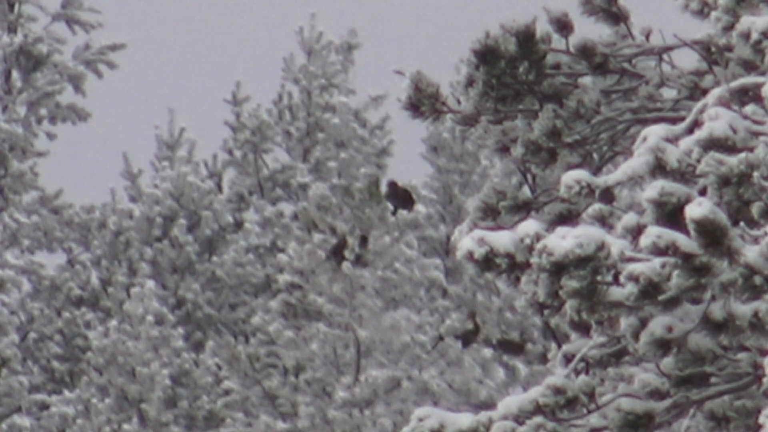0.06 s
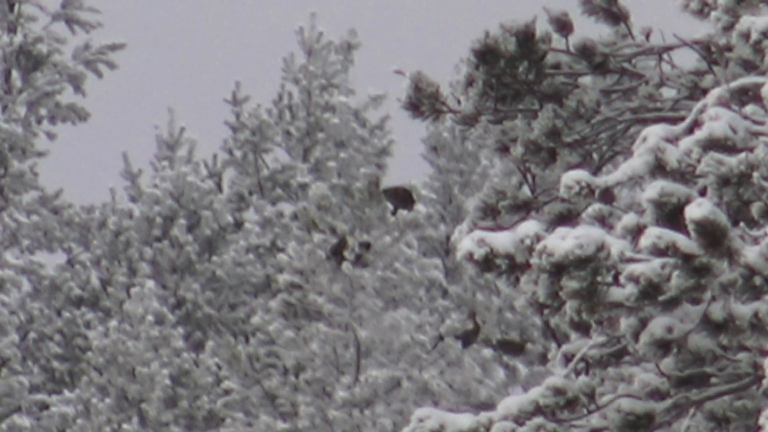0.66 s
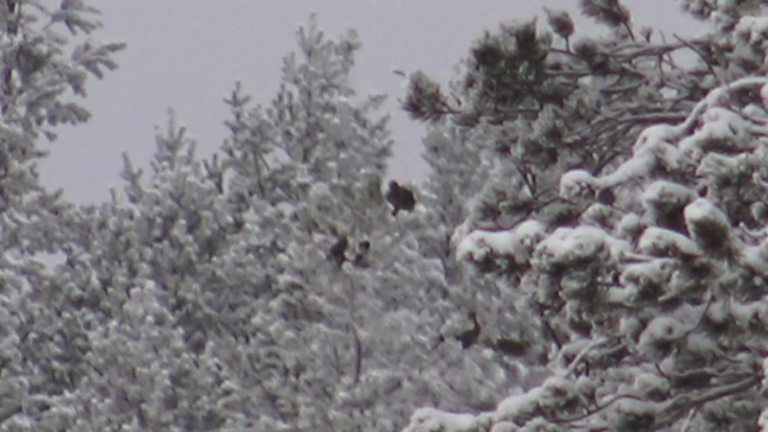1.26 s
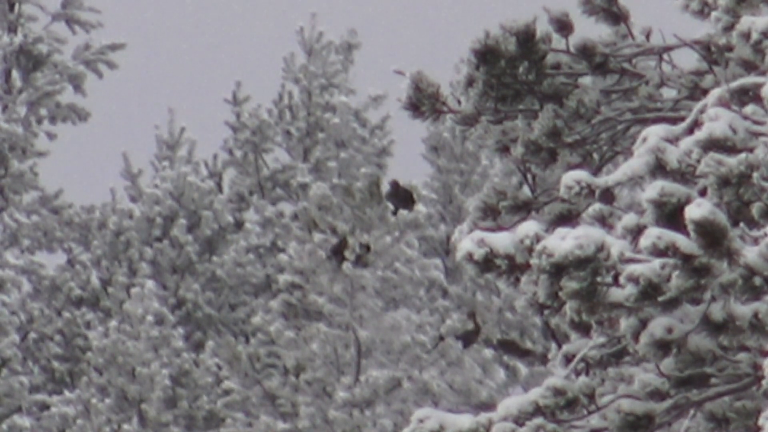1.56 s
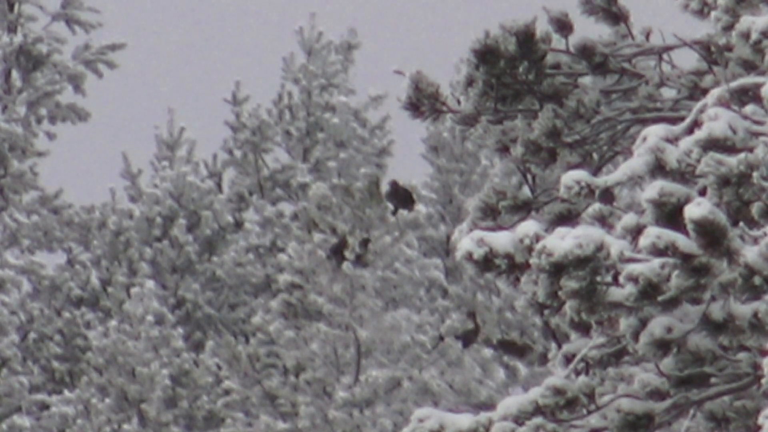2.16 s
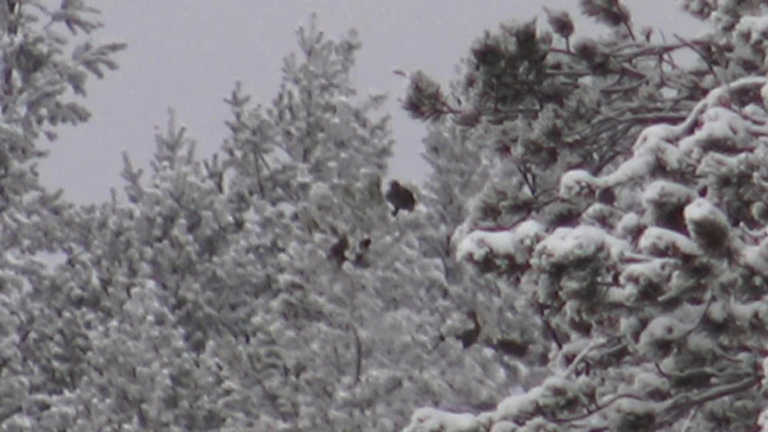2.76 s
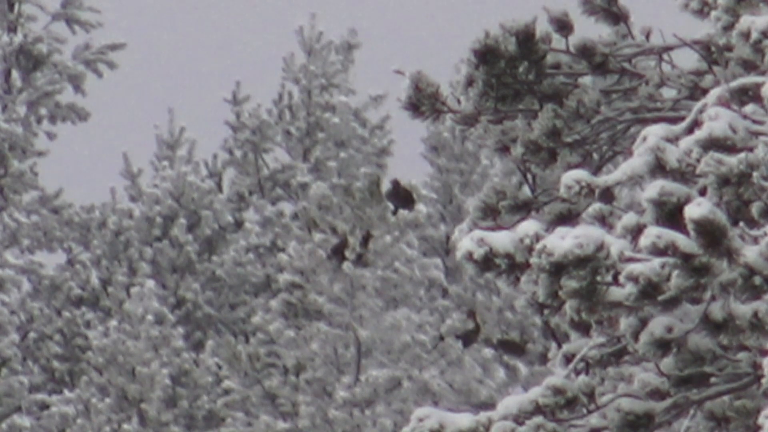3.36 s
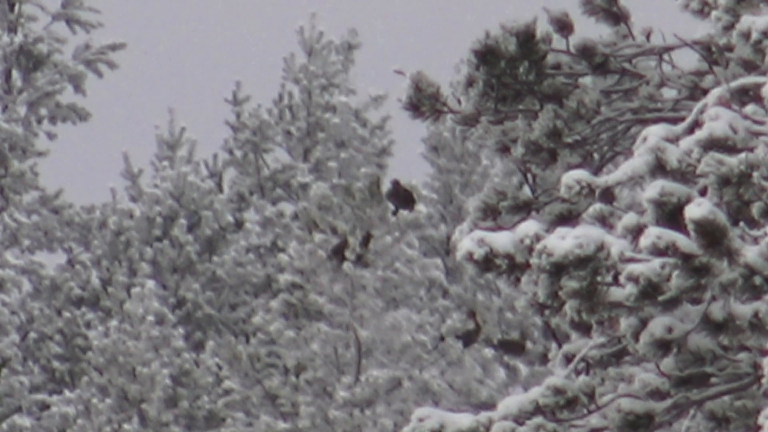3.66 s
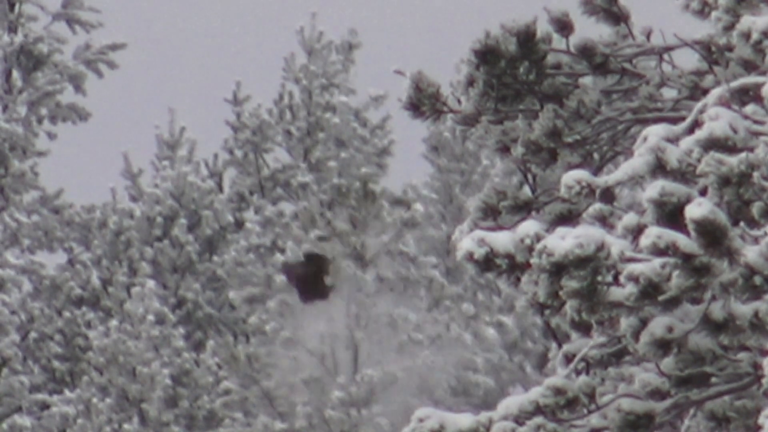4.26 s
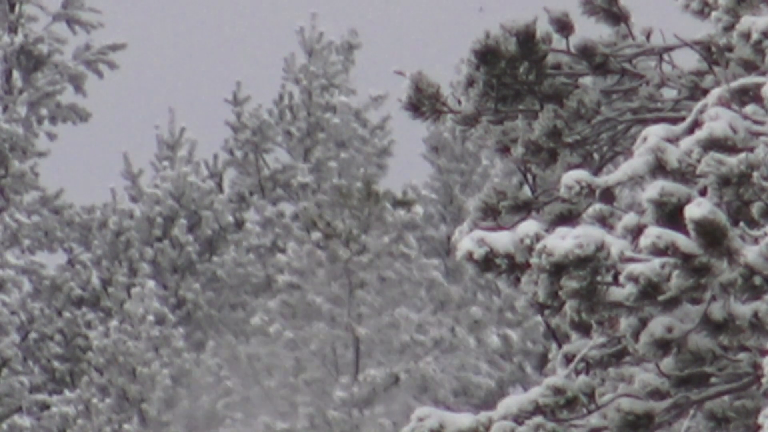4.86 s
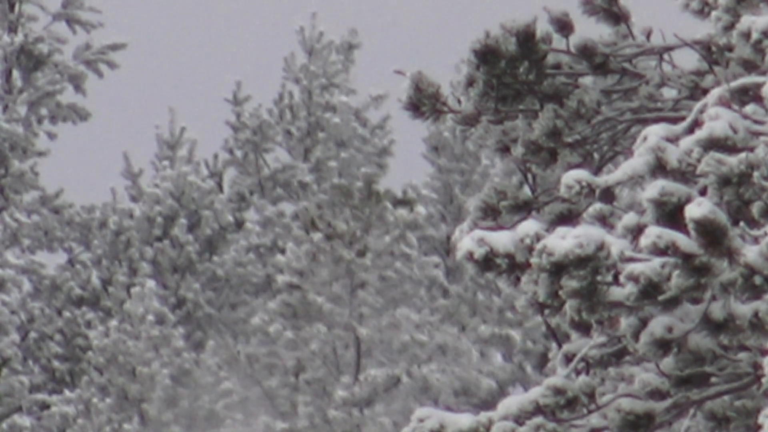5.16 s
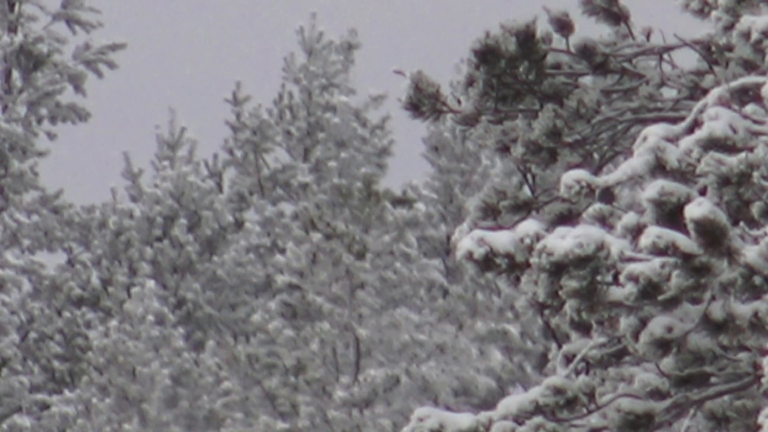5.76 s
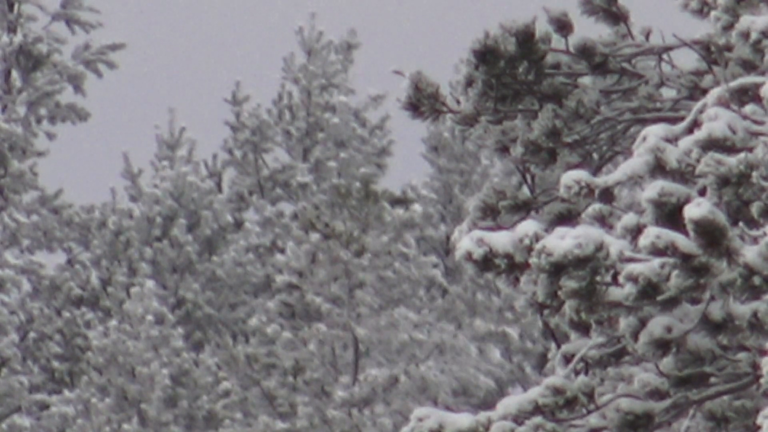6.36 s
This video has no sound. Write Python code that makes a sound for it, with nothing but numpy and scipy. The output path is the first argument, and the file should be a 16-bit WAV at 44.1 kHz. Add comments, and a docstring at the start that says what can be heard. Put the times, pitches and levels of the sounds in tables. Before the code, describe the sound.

Faint winter forest hiss, then one close rifle shot with crackling echoes and a long tail that dulls and fades.

```python
"""First comes the faint hiss of a still, snowy forest, with puffs of air and a low hum that comes and goes.
Then one rifle shot goes off, close enough to overload the microphone. Trunks throw back sharp cracks,
and the bang rolls away through the trees, duller the farther it has travelled. The thud of the bullet's
strike returns from far off, and snow rustles softly at the end."""
import sys
import numpy as np
from scipy import signal
from scipy.fft import rfft, irfft, next_fast_len
from scipy.io import wavfile
from scipy.ndimage import uniform_filter1d

SR = 44100
rng = np.random.default_rng(int(sys.argv[2]) if len(sys.argv) > 2 else 0)


def unload_wav(signal):
    """Save mono or channel-first audio to the path in sys.argv[1] as 16-bit WAV at rate SR, clipped to [-1, 1]."""
    wavfile.write(
        sys.argv[1],
        SR,
        np.round(np.clip(np.atleast_2d(signal).T, -1, 1) * 32767).astype(np.int16),
    )


N = 287532
TIME = np.arange(N) / SR
SHOT_S, STRIKE_S = 3.6084, 4.2842


def from_db(db):
    """Turn decibels (dB) into a number to multiply by."""
    return 10 ** (np.asarray(db) / 20)


def rms_one(x):
    """Scale a sound so that its average strength (rms) is 1."""
    return x / np.sqrt(np.mean(x ** 2) + 1e-20)


def cut(x, hz, keep, order=2):
    """Keep the "low" or "high" side of hz; a higher order cuts more steeply."""
    return signal.sosfilt(signal.butter(order, min(hz, .45 * SR), keep, fs=SR, output="sos"), x + 1e-18)


def band(x, bottom_hz, top_hz, bottom_order=2, top_order=2):
    """Keep what lies between two frequencies."""
    return cut(cut(x, top_hz, "low", top_order), bottom_hz, "high", bottom_order)


def colour_gain(colour, hz):
    """Read the gain at hz from a colour table, which says how strong lows and highs are."""
    points_hz, levels_db = np.transpose(colour)
    return from_db(np.interp(np.log(hz), np.log(points_hz), levels_db))


def noise(colour):
    """Noise of a given colour, with strength 1."""
    bin_hz = np.maximum(np.fft.rfftfreq(N, 1 / SR), 1)
    return rms_one(irfft(rfft(rng.standard_normal(N)) * colour_gain(colour, bin_hz), N))


def wander(hz):
    """A slow random wobble of strength 1; a higher hz wobbles faster."""
    return rms_one(cut(rng.standard_normal(N), hz, "low"))


def swell(peak_s, width_s, level_db):
    """A smooth, bell-shaped rise and fall of power."""
    return from_db(level_db) ** 2 * np.exp(-((TIME - peak_s) / width_s) ** 2 / 2)


def dying(start, t60):
    """A level that jumps to 1, then drops 60 dB every t60 seconds."""
    return (TIME >= start) * from_db(-60 * np.maximum(TIME - start, 0) / t60)


def shock(start, push_s):
    """A blast wave: a sudden push of height 1, then a longer, weaker suction."""
    age = np.maximum(TIME - start, 0) / push_s
    return (TIME >= start) * (1 - age) * np.exp(-np.minimum(age, 50))


# The colour of the quiet forest. Each row: frequency in Hz, relative level in dB.
HISS_COLOUR = [(60, -0.5), (100, -3.5), (150, -7.5), (200, -8), (233, -4.5), (280, -11.5), (400, -13),
               (600, -15.5), (800, -18.5), (980, -17), (1250, -21), (2000, -25.5), (4000, -29), (8000, -32),
               (15500, -35)]

def forest_hiss(level_db=-67.06):
    """The still forest gives a faint, steady hiss."""
    return from_db(level_db) * noise(HISS_COLOUR)


def forest_rumble(sway_db=-59, rumble_db=-69):
    """Slow swings of air pressure and a deep rumble lie under everything."""
    sway = from_db(sway_db) * wander(hz=12)
    return sway + from_db(rumble_db) * rms_one(band(rng.standard_normal(N), 38, 64, top_order=5))


# Puffs of air. Each row: time of the peak in seconds, width in seconds, relative level in dB.
PUFFS = [(.19, 0.044, -39.5), (.45, 0.18, -47), (.82, 0.12, -46.5), (1.26, 0.089, -46.5),
         (2.35, 0.057, -49.5)]

def air_puffs(level_db=-3, calm_db=-61.5):
    """Air stirs at the microphone, swelling now and then into a soft, deep puff."""
    strength = np.sqrt(from_db(calm_db) ** 2 + sum(swell(*puff) for puff in PUFFS))
    return from_db(level_db) * strength * rms_one(band(rng.standard_normal(N), 14, 38, top_order=3))


# Swells of the hum. Each row: peak time in seconds, width in seconds, relative level in dB, pitch in Hz.
HUM_SWELLS = [(.38, 0.042, -44.5, 63.9), (.55, 0.048, -46.5, 69.9), (.82, 0.12, -53.5, 44.9),
              (4.62, 0.051, -52.5, 56), (4.84, .05, -49, 54), (4.97, .04, -48.5, 65),
              (5.29, 0.062, -57.5, 51.2), (5.64, .13, -51.5, 46.04), (6.18, 0.033, -57, 42.9)]

def low_hum(level_db=-2, waver=.5):
    """A wavering hum glides from the pitch of one swell to that of the next."""
    peaks_s, _, _, pitches_hz = np.transpose(HUM_SWELLS)
    hz = np.interp(TIME, peaks_s, pitches_hz)
    phase = 2 * np.pi * np.cumsum(hz) / SR + wander(hz=5)
    strength = np.sqrt(sum(swell(s, width, db) for s, width, db, _ in HUM_SWELLS))
    return from_db(level_db) * strength * (1 + waver * wander(hz=8.5)) * np.sqrt(2) * np.sin(phase)


# The colour of the gas burst and the bright spray. Each row: frequency in Hz, relative level in dB.
SPRAY_COLOUR = [(25, -10), (50, 0.5), (160, -11.5), (400, -0.5), (650, -1.5), (1000, -12), (1500, -1.5),
                (3000, -0.5), (4800, 0), (6200, -3.5), (7900, 4), (10000, -2), (15500, -3.5)]

def rifle_shot(lead_s=.0011, push_s=.00048, swing_hz=660, handover_s=3.65):
    """A short crack leads the blast and its burst of gas; sound sprays back off close twigs and snow."""
    crack = from_db(-8) * rms_one(band(rng.standard_normal(N), 1300, 2500))
    crack *= dying(SHOT_S - lead_s, t60=.02)
    blast = -from_db(8) * shock(SHOT_S, push_s)
    # the blast leaves a brief, hollow swing behind it
    blast -= from_db(-5) * np.sin(2 * np.pi * swing_hz * (TIME - SHOT_S)) * dying(SHOT_S, t60=.016)
    gas = from_db(1) * rms_one(band(noise(SPRAY_COLOUR), 380, 7000, top_order=1))
    gas *= dying(SHOT_S + push_s / 2, t60=.02)
    spray = from_db(-16) * noise(SPRAY_COLOUR) * dying(SHOT_S, t60=.5)
    # the close twigs are soon all reached, and the spray gives way to the rolling echo
    spray *= from_db(-60 * np.maximum(TIME - handover_s, 0) / .22)
    return crack + blast + gas + spray


# Groups of trees, each sending back one wave of the rolling echo. Each row: start, rise time and hold
# time in seconds, relative level in dB, fall in dB per second, extra treble from a clear path in dB.
TREE_GROUPS = [(3.648, 0.21, 0.033, -20.5, 35, -.5), (4.002, 0.15, .03, -25.5, 19.5, -1),
               (4.38, .012, 0.072, -19.5, 62.5, 7.5), (4.731, .06, .02, -33.5, 31, 9),
               (4.857, 0.026, 0.025, -29, 26, 12), (5.92, .08, .02, -57, 19.5, 3),
               (6.437, 0.063, .05, -55.5, 26, -1)]

def echo_waves(rise_power=.62, clear_fade_s=.25):
    """The waves rise, hold and fall; gives their joint level and their extra treble, both in dB."""
    power, treble = np.full(N, 1e-14), np.zeros(N)
    for start, rise, hold, level_db, fall_db_per_s, clear_db in TREE_GROUPS:
        rising = np.clip((TIME - start) / rise, 0, 1) ** rise_power
        fallen_db = fall_db_per_s * np.maximum(TIME - start - rise - hold, 0)
        wave = (rising * from_db(level_db - fallen_db)) ** 2
        power += wave
        # later echoes come from deeper among the trees, so the extra treble fades
        treble += wave * clear_db * np.exp(-np.maximum(TIME - start, 0) / clear_fade_s)
    return 10 * np.log10(power), treble / power


# The colour of the rolling echo before it dulls. Each row: frequency in Hz, relative level in dB.
ROLL_COLOUR = [(100, -60), (180, -44.5), (280, -29.5), (450, -18), (700, -6.5), (1000, -1), (1500, 5.5),
               (2200, 7), (3000, 3.5), (4200, -1), (5300, 0.5), (6500, -7.5), (8100, 1.5), (10000, -8.5),
               (15500, -9.5)]

def rolling_echo(level_db=-1, echoes_per_s=5000, loss_power=.53, patchy_db=1.3):
    """Thousands of small echoes merge; air and snow take more treble as their paths grow longer."""
    after = TIME >= SHOT_S
    age = TIME[after] - SHOT_S
    count = len(age)
    waves_db, clear_db = (curve[after] for curve in echo_waves())
    travel_loss_db = np.minimum(-7.5 + 38 * age ** .63, 58)
    # some paths are clearer than others, so the treble comes in patches
    dull_db = travel_loss_db - clear_db + patchy_db * wander(hz=25)[after]
    # echoes differ in strength, a little more so early on
    grain_db = 3 + .7 * np.exp(-age / .8)
    echoes = (rng.random(count) < echoes_per_s / SR) * rng.choice([-1, 1], count)
    echoes = echoes * from_db(grain_db * np.minimum(rng.exponential(1, count), 3.5))
    echoes /= np.sqrt(np.maximum(uniform_filter1d(echoes ** 2, size=800), 1e-9))  # even out the level
    size = next_fast_len(count)
    bin_hz = np.maximum(np.fft.rfftfreq(size, 1 / SR), 1)
    # scaled so that the octave round 1 kHz has a strength of about 1
    spectrum = rfft(echoes, size) * colour_gain(ROLL_COLOUR, bin_hz) * np.sqrt(SR / 2 / 800)
    # split into overlapping bands, so that each can fade at its own pace
    centres_hz = np.geomspace(300, 16000, 18)
    band_number = np.interp(np.log(bin_hz), np.log(centres_hz), np.arange(len(centres_hz)))
    out = np.zeros(N)
    for k, hz in enumerate(centres_hz):
        # this band's share of the dulling: 0 at 1 kHz, 1 at 4 kHz
        share = ((max(hz, 380) / 1000) ** loss_power - 1) / (4 ** loss_power - 1)
        one_band = irfft(spectrum * np.maximum(1 - abs(band_number - k), 0), size)[:count]
        out[after] += one_band * from_db(level_db + waves_db - dull_db * share)
    return out


def faint_trunks(per_s=32, from_s=3.68, until_s=4.27, fade_db_per_s=12, count=64):
    """Fainter trunks answer from random distances; gives rows like those of LOUD_TRUNKS."""
    starts = from_s + np.cumsum(rng.uniform(.2, 1.8, count)) / per_s
    levels_db = -14.5 - fade_db_per_s * (starts - from_s) + 2 * rng.standard_normal(count)
    thickness = np.exp(.17 * rng.standard_normal(count))
    return np.transpose([starts, levels_db, thickness])[starts < until_s]


# The loudest echoes off single trunks.
# Each row: start in seconds, relative level in dB, thickness (1 is an ordinary trunk).
LOUD_TRUNKS = [(3.6576, -10.5, 0.73), (3.6682, -2.5, 1.16), (3.6772, -4.5, 2.7), (3.6850, -12.5, 0.76),
               (3.7100, -1.5, 0.93), (3.7131, -9.5, 1.4), (3.739, -6, 0.79), (3.7480, -5, 0.84),
               (3.7646, -3, 1.24), (3.8037, -3.5, 1), (3.8056, -5, 1), (3.8248, -4.5, 1.1), (3.8312, -9, 1),
               (3.845, -7.5, 1), (3.8757, -9.5, .9), (3.9017, -9.5, 1.08), (3.9217, -10.5, 1.28),
               (3.9414, -4.5, 1.09), (3.9455, -11, 1), (3.9699, -11.5, 1), (4.0940, -12.5, 0.97),
               (4.2417, -16, 1.05), (4.3891, -13.5, 0.84), (4.4221, -9.5, 1), (4.868, -23, 1.1),
               (4.900, -21.5, 1.03)]

def trunk_echoes(level_db=-.47, bark_roughness=.35, snap_s=.00084, size=1024):
    """Each trunk returns the blast as a snap, frayed by its bark; far or thick trunks sound lower."""
    out, age = np.zeros(N), np.arange(size) / SR
    click = age == 0
    for (start, db, thickness), fray in zip([*LOUD_TRUNKS, *faint_trunks()],
                                            rng.standard_normal((96, size))):
        # an ordinary trunk snaps near 2400 Hz when the sound has travelled for 0.1 seconds
        hz = 2400 * ((start - SHOT_S) / .1) ** -.26 / thickness
        snap = bark_roughness * fray * np.exp(-(age / snap_s) ** 2 / 2) - click
        snap = band(snap, .58 * hz, 1.403 * hz, bottom_order=3, top_order=5)
        snap /= np.sqrt(np.sum(snap ** 2) / (.002 * SR))  # strength 1 if spread over 2 milliseconds
        at = round(start * SR)
        out[at:at + size] += from_db(level_db + db) * snap
    return out


# Echoes off the nearest slopes. Each row: start in seconds, relative level in dB.
SLOPES = [(3.7083, -18), (3.7643, -24.5), (3.8048, -31.5), (3.94, -35)]

def slope_thumps(top_hz=200, push_s=.0014):
    """The slopes send back the bass of the blast as soft thumps."""
    return cut(sum(-from_db(db) * shock(s, push_s) for s, db in SLOPES), top_hz, "low")


# Echoes off needle-covered branches.
# Each row: start in seconds, level in dB, rough pitch in Hz, seconds to fade by 60 dB.
BRANCHES = [(3.9697, -17, 6460, 0.006), (4.047, -29, 4000, 0.055), (4.126, -23, 3020, .03),
            (4.197, -39.5, 6500, 0.041), (4.785, -49, 3800, .04), (5.190, -57, 3410, .04)]

def branch_echoes():
    """Each branch scatters the blast into a short, bright spit of hiss."""
    needles, out = rng.standard_normal(N), np.zeros(N)
    for start, db, hz, t60 in BRANCHES:
        hiss = rms_one(band(needles, .71 * hz, 1.04 * hz, bottom_order=3, top_order=4))
        out += from_db(db) * hiss * dying(start, t60)
    return out


def bullet_strike(thud_push_s=.00035, slap_delay_s=.0017):
    """The bullet lands far away: a hollow thud, a sharper slap just after it, and a brief splintering."""
    slap_s = STRIKE_S + slap_delay_s
    thud = band(-from_db(13) * shock(STRIKE_S - thud_push_s, thud_push_s), 520, 1000, top_order=4)
    slap = band(-from_db(12) * shock(slap_s, push_s=.00022), 750, 2400, top_order=3)
    splinters = rms_one(band(rng.standard_normal(N), 950, 3600, top_order=4))
    return thud + slap + from_db(-14) * splinters * dying(slap_s, t60=.025)


# Swells of the rustle. Each row: time of the peak in seconds, width in seconds, level in dB.
RUSTLES = [(5.9, .45, -81.5), (6.27, .05, -79)]
# The colour of the rustle. Each row: frequency in Hz, relative level in dB.
RUSTLE_COLOUR = [(500, -14), (2000, 0), (4000, 0), (8000, -4), (15500, -15)]

def snow_rustle(flicker_db=1.5):
    """A soft, flickering hiss, like snow sifting off the branches."""
    strength = np.sqrt(sum(swell(*row) for row in RUSTLES))
    return strength * from_db(flicker_db * wander(hz=30)) * noise(RUSTLE_COLOUR)


def scene():
    """The shot, its echoes and the quiet forest add up at one microphone."""
    shot = rifle_shot() + trunk_echoes() + branch_echoes() + slope_thumps() + rolling_echo()
    shot += bullet_strike()
    forest = air_puffs() + forest_rumble() + low_hum() + forest_hiss() + snow_rustle()
    return (shot + forest)[None]


def record(dry, hardness=14, top_hz=15800):
    """The microphone overloads, flattening the loudest peaks; then the highest treble is cut away."""
    clipped = dry / (1 + np.abs(dry) ** hardness) ** (1 / hardness)
    return signal.sosfilt(signal.ellip(10, .1, 70, top_hz, fs=SR, output="sos"), clipped)


dry = scene()
out = record(dry)
unload_wav(out)
```